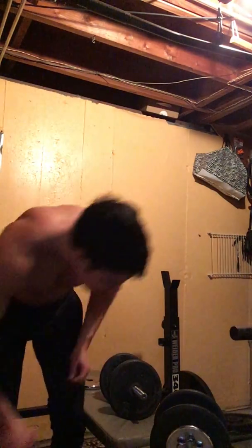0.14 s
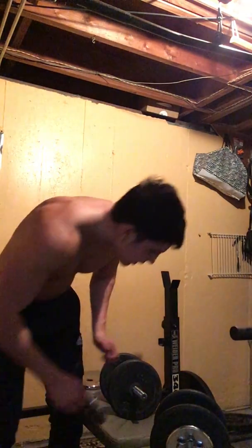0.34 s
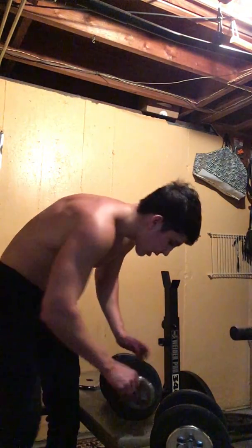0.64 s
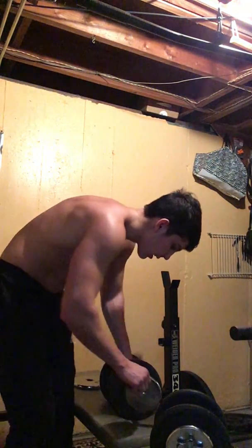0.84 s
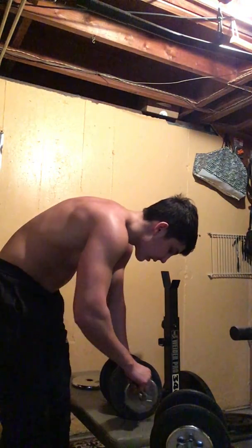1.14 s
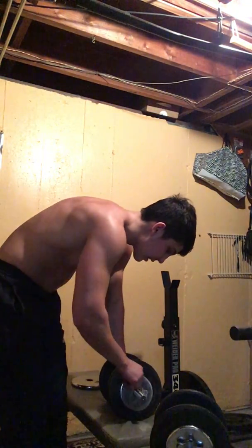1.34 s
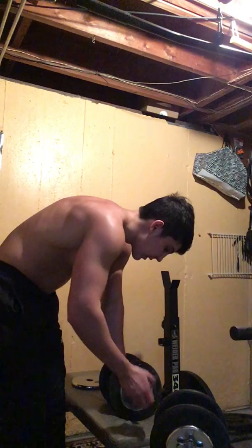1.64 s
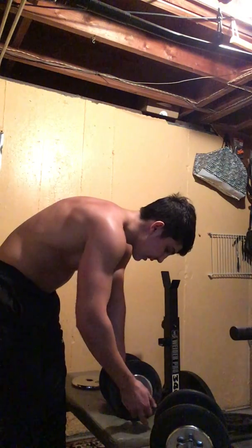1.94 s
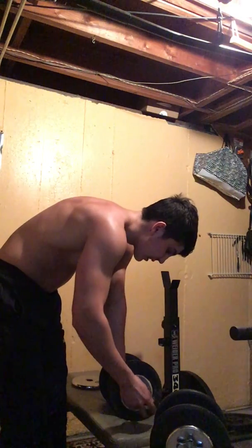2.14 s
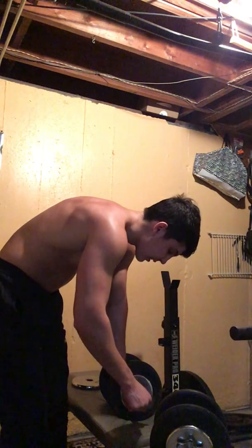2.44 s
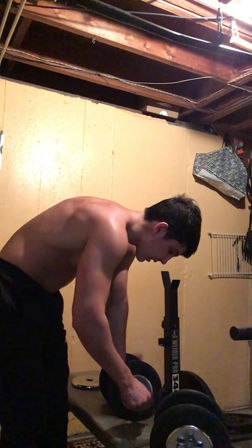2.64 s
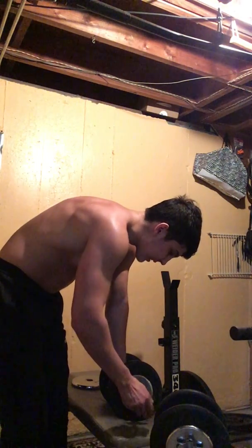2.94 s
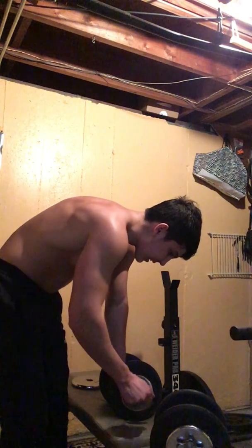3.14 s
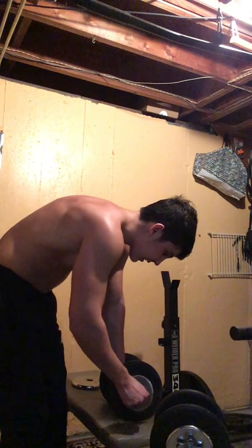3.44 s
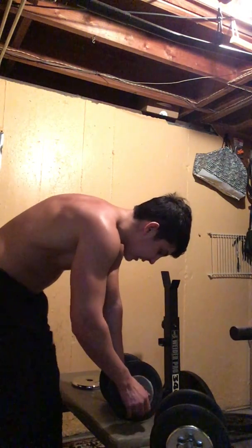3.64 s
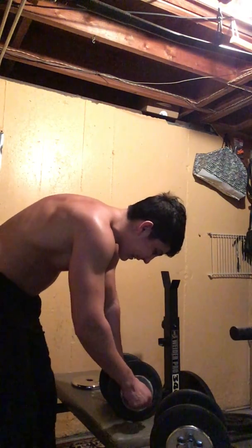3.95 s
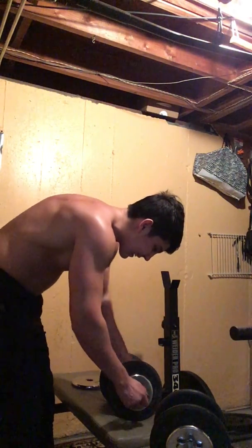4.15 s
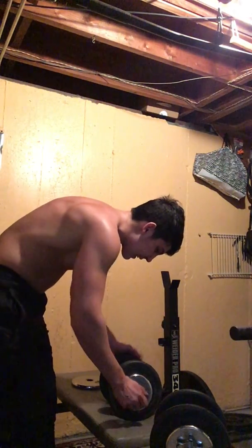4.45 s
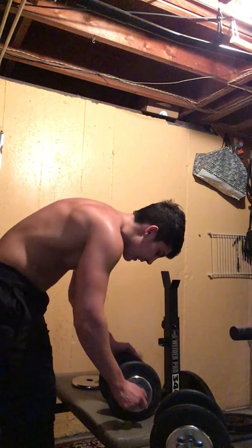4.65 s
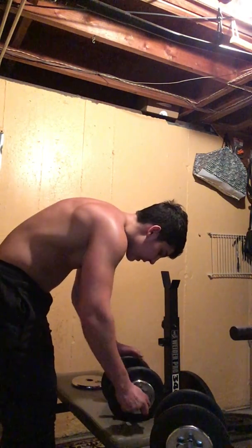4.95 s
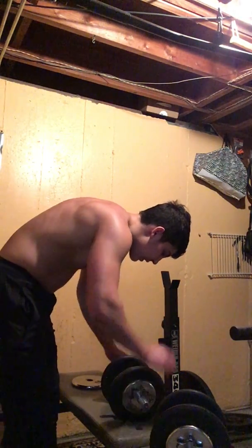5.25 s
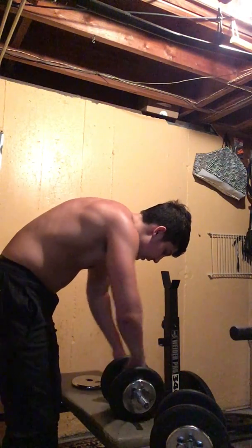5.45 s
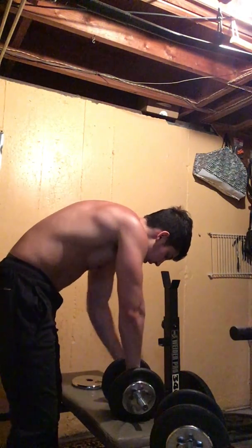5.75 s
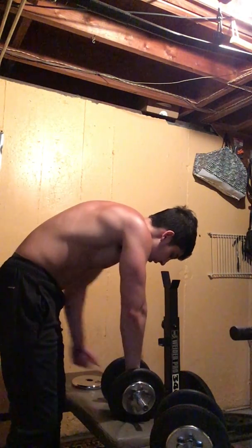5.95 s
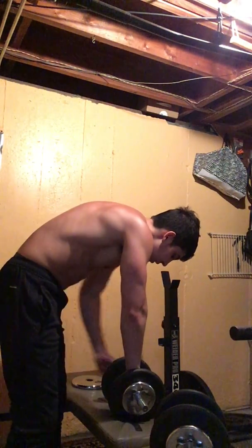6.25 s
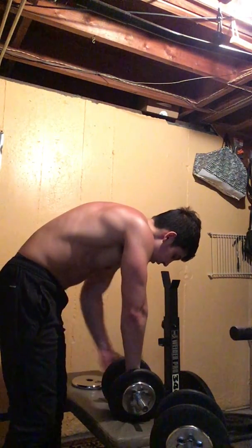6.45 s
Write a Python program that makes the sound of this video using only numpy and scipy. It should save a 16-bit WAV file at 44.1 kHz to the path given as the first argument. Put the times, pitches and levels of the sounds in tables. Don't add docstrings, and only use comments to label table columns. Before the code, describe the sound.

Steel weight plate taps a dumbbell handle, slides and clanks home ringing, then a threaded collar rasps tight in short twists over low basement fan rumble.

```python
import sys
import numpy as np
from scipy import signal
from scipy.fft import rfft, irfft, next_fast_len
from scipy.io import wavfile
from scipy.ndimage import uniform_filter1d, map_coordinates

SR = 44100
rng = np.random.default_rng(int(sys.argv[2]) if len(sys.argv) > 2 else 0)


def convert_level_to_amplitude(level_db):
    exponent = np.asarray(level_db, float) / 20
    return 10 ** exponent


def pcm_store(signal):
    levels = np.round(np.clip(np.atleast_2d(signal), -1, 1) * 32767)
    wavfile.write(sys.argv[1], SR, levels.astype(np.int16).T)


N = 291015

# [t/s, knock peak level/dB, ring level of the lowest mode family/dB, sharpness/dB per octave,
# extra level of the second family when struck near the hub/dB (may be absent)]
TAP_HITS = [
    (0.864, -17, -40, 2.4, 15.5),
    (0.911, -21.5, -60.5, 4.4, -12),
]
BEAT_HITS = [
    (0.864, -60, -32, 0),
]
SLIDE_HITS = [
    (1.139, -35, -50, -5.5, -0.5),
    (1.174, -41, -45.5, -1, -23.5),
    (1.199, -27.5, -29, 0.5, -22),
    (1.216, -30.5, -48, 4, 4),
    (1.298, -10, -28, -3.5, -9),
    (1.306, -25.5, -46.5, 2, 12),
    (1.344, -33, -49.5, -6, -7),
    (1.38, -33.5, -47.5, 5.5, -2.5),
]
HOME_HITS = [(1.394, -6, -29, 3, -2.5), (1.432, -13, -36.5, 15, -22), (1.44, -21, -22.5, 1, -11.5),
             (1.447, -15, -24, 5, -8), (1.462, -18.5, -36.5, 3.5, -6.5), (1.487, -46.5, -40.5, 12, -27.5),
             (1.511, -24, -31, -2.5, 8.5), (1.518, -12.5, -21, 6.5, -18), (1.528, -1.5, -21, 9, -4),
             (1.551, -22.5, -55, 8.5, 11.5), (1.584, -15.5, -29.5, 8, -5), (1.621, -12.5, -27.5, 4.5, -20),
             (1.663, -20, -35.5, 5, -14.5)]
SLAP_HITS = [
    (4.872, -30, -41, -7, -27),
    (4.926, -27, -30, -4.5, -12.5),
    (4.945, -22.5, -42.5, 8, -27),
    (4.962, -19.5, -40, 6.5, -13.5),
    (4.999, -18.5, -46.5, 5.5, -7),
]
SEAT_HITS = [
    (5.012, -6, -23, 3.8, 5.4),
]
COLLAR_HITS = [(1.914, -18, -55.5, 2.5, 22), (2.126, -73.0, -41, -14, -29), (2.168, -24, -46, -3, 9.5),
               (2.194, -26.5, -33, -11.5, -18), (2.378, -58, -62, -5.5, -4), (2.517, -26, -47.5, -4, 4),
               (2.752, -44, -48, -23, 2), (2.763, -29.5, -36, -8, -2), (2.773, -45, -44.5, -7.5, 11),
               (2.811, -25.5, -29, -11.5, -9), (2.832, -29, -39.5, -9, 7.5), (2.909, -34, -57, -9, 3),
               (2.989, -47, -47, -7, 2), (3.012, -28.5, -48.5, -10, 7),
               (3.115, -21.5, -51, 0.5, 14.5), (3.12, -50, -38, -7, 7), (3.159, -41, -45, -2, -8),
                (3.172, -25.5, -33.5, -7, -1), (3.204, -27, -26.5, -7, -7), (3.23, -25, -36, -8, -1),
                (3.257, -23.5, -32.5, -5, -5.5), (3.29, -28.5, -52.5, -3, 9), (3.33, -33, -43, -1, -1),
                (3.468, -23, -47.5, -2, 9), (3.538, -18.5, -33.5, -2.5, -5.5),
                (3.721, -54.5, -50.5, -6.5, -18.5), (3.734, -51.5, -46, -6, -25),
                (3.868, -20.5, -33.5, -7, 5), (3.925, -28.5, -33.5, -4, -23), (3.97, -24.5, -32, -2.5, -9),
                (4.094, -47, -40.5, -10, -12), (4.137, -31.5, -35, -9, -28), (4.253, -57, -38.5, -8.5, -13),
                (4.285, -32, -35.5, -5.5, -44), (4.376, -53.5, -59, -2.5, -13), (4.591, -22, -56, 2, 18.5),
                (4.656, -26.5, -53, -4, -1)]
JINGLE_HITS = [
    (4.945, -44, -71, 6.3, 0.0072),
    (4.962, -41.5, -74, 11, 0.0042),
]
TURN_HITS = [(4.802, -29.5, -33.5, -39, -6), (4.833, -49.5, -45, -34.5, -7), (5.393, -41.5, -79, -6, 8),
             (5.607, -36.5, -35, -18.5, 0), (5.632, -37, -37, -20, -4), (5.691, -31, -76, -19, 4.5),
             (5.946, -27, -51, -5, 6), (5.995, -19.5, -48, 3.5, 19), (6.014, -30, -43, -4, 22),
             (6.026, -22, -42, -13, 23), (6.106, -29.5, -48, -15, -1.0), (6.148, -35, -72, -12, -1),
             (6.381, -51, -75, 7, -9), (6.569, -30, -62.5, -10, 8), (6.577, -13.5, -42, 11.5, 25.5)]
BAR_HITS = [
    (4.795, -44.5, -70.5, 19, 0),
    (5.607, -56, -66, 21, 0),
    (5.948, -62, -66, 20, 0),
]
SPARE_HITS = [
    (5.013, -45, -40, -16),
    (5.395, -71, -79, 12),
    (5.992, -60, -48, -39),
    (6.055, -60, -47, -39),
]
PING_HITS = [
    (5.723, -37, -44, -35),
]

# [f/Hz, f/Hz, f/Hz, f/Hz]
FAMILY_HZ = dict(held=[1400, 3650, 5900, 8500], plate=[1920, 3080, 3650, 5900],
             collar=[1400, 3000, 10100, 15200], end=[3970, 6600, 9550, 10700],
             spare=[1738, 2422, 4000, 8000], bar=[8000, 9000, 10000, 11000])
TAP_HZ = [1459, 1701, 3079, 3198, 4382, 5862, 5870, 6568, 8489, 8507, 10930, 11830]
BEAT_HZ = [3647, 3653.4]
PLATE_HZ = [673, 1377, 1923, 1912, 2900, 3074, 3290, 3524, 3650, 3690, 3818, 4395, 5858, 5914, 6490, 6715,
            7430, 8512, 8630, 10860, 11750, 12230, 14140, 15300]
SMACK_HZ = [3160]
SEATED_HZ = [1927, 2460, 3090, 3284, 3524, 3577, 3655, 3698, 3818, 4430, 5938, 6490, 6729, 7440, 8533, 8629,
             10880, 11750, 12230, 14150, 15300]
COLLAR_HZ = [856, 1390, 1925, 2890, 3045, 3670, 4400, 6570, 9520, 10120, 11200, 12700, 15180]
STACK_HZ = [744, 1180, 1330, 1480]
END_HZ = [3973, 5240, 6600, 7500, 8300, 9550, 10700, 12700, 10640]
BAR_HZ = [11070]
SPARE_HZ = [1735, 1742, 1763, 2417, 2425.5]
PING_HZ = [1740, 1800, 2412]
DRAG_HZ = [2213, 2837, 3182, 3919, 7520]
TAPPED = [(-8, 0.017), (-3, 0.079), (-14, 0.16), (-10, 0.078), (-10, 0.049), (-29, 0.44), (-24, .2),
          (-4, .03), (3, 0.11), (-6, 0.28), (-22, .1), (-15, 0.44)]
BEAT = [(0, .35), (0, .35)]
HELD = [(-18, 0.07), (8, 0.018), (-19, 0.27), (-11, .2), (1, 0.24), (-4.5, 0.2), (-17, 0.12), (-5.5, .1),
        (-2.5, 0.15), (-18, 0.4), (-14, 0.086), (-5.5, 0.12), (1.5, 0.12), (-21.5, 0.23), (-9.5, 0.065),
        (-18, 0.13), (-11.5, 0.083), (-9.5, 0.11), (-9.5, 0.11), (-17, 0.089), (-11.5, 0.3), (-15, 0.13),
        (-29.5, .1), (-36, .1)]
LOOSE = [(-2.5, 0.049), (-21, 0.11), (5.5, 0.29), (-10.5, 0.1), (-17.5, .2), (2, 0.36), (-16, 0.13),
         (-14.5, 0.11), (1.5, 0.29), (-8.5, 0.05), (-29, 0.13), (-13.5, 0.45), (-2, 0.202), (1, 0.3),
         (-22.5, 0.17), (-9.5, 0.22), (-10.5, 0.13), (-6.5, 0.41), (-17.5, .2), (-20, 0.13), (-19, 0.24),
         (-31, 0.13), (-18, .15), (-33.5, 0.11)]
SMACK = [(0.0023, 0.0088)]
CLAMPED = [(-31, 0.087), (-28, .1), (2.5, 0.99), (-18.5, 0.33), (-15, 0.089), (5, 0.19), (-7, .14),
           (-10, .15), (12, 0.25), (-25.5, 0.15), (-10.5, 0.0914), (-14, .12), (-7.5, 0.061), (14.5, 0.036),
           (-26, 0.23), (-10.5, 0.17), (-20, 0.071), (-6.5, 0.084), (-9.5, 0.14), (-11.5, 0.047),
           (-16, 0.05), (-22, 0.11), (-26.5, .14), (-27, .1)]
SEATED = [(-1.5, 0.16), (-25, 0.27), (-0.5, 0.16), (-16, 0.19), (-4.5, 0.083), (-5, .09), (8.5, 0.08),
          (-13, 0.2), (3.5, 0.063), (-8, 0.14), (-11, 0.12), (3, 0.042), (-14.5, 0.2), (-12, 0.13),
          (-10.5, .13), (-10, 0.21), (-18, 0.13), (-19.5, .06), (-24, .08), (-11.5, .07), (-29, .1)]
COLLAR = [(-10, 0.069), (-0.5, 0.038), (-10, 0.24), (5.5, 0.035), (2.5, 0.051), (-7, 0.085), (2, 0.036),
          (-2.5, 0.038), (-7.5, 0.1), (2, 0.067), (-22.5, 0.065), (-24, 0.093), (-3.5, 0.1)]
STACK = [(-8, 0.039), (-4.5, 0.032), (-8, 0.078), (-14.5, 0.054)]
FAR_END = [(0.5, 0.054), (-17.5, 0.15), (-5, 0.0083), (-18.5, 0.11), (-12.5, 0.07), (-4, 0.092),
           (-12.5, 1.1), (-25, .08), (-22, .4)]
BAR = [(0.0055, .4)]
SPARE = [(0, 0.95), (-5, .95), (-9, .6), (-4, 1.1), (-4, 1.1)]
PING = [(0.5, 0.42), (0, 0.2), (-0.5, 0.48)]
DRAG = [(2, .6), (9, .6), (9, .6), (11, .6), (6, .6)]

# [t/s, peak level/dB, f/Hz, t60/s]
BLOWS = [(0.8641, -21, 1470, .014), (0.871, -31, 3650, 0.026), (0.91, -26.5, 1300, .01),
         (1.1995, -13.5, 1600, .009), (1.2984, -16, 1520, .009), (1.394, -11, 1520, .008),
         (1.408, -23.5, 1925, 0.14), (1.447, -21, 3650, 0.037), (1.462, -25, 3650, 0.021),
         (1.485, -25.5, 3650, 0.13), (1.5185, -11.5, 2220, .012), (1.5185, -22.5, 713, .02),
         (1.5275, -4, 3640, .03), (1.5268, -20.5, 5990, .02), (1.584, -27.5, 700, .015),
         (2.81, -30, 1370, .025), (2.826, -32, 2960, .015), (3.114, -29, 3030, .03),
         (3.2567, -33, 5480, .006), (3.2916, -39, 5000, .006), (3.4682, -33, 3000, .015),
         (4.122, -44, 3010, .01), (4.142, -41, 2700, .015), (4.946, -23.5, 6280, .012),
         (4.962, -21.5, 6740, .007), (5.447, -49.5, 1300, 0.054), (5.614, -40, 4000, .1),
         (5.632, -48, 7000, .008), (5.799, -60, 4070, .04), (5.994, -36, 7540, .005),
         (5.998, -29.5, 7060, .009), (6.014, -34, 6860, .009), (6.025, -29, 7000, .009),
         (6.578, -16, 6480, .009), (6.584, -18, 6400, .01)]
# [t/s, grind level/dB, rasp level/dB, fade/dB per s, wind-up level under the stroke/dB]
STROKES = [(0.864, -36.5, -52, 143, -28), (1.203, -31, -41, 71.5, -4), (1.299, -33.5, -47, 33.5, -8),
           (1.395, -34, -58.5, 39, -17), (1.445, -42.5, -53.5, 150, 6), (1.513, -38.5, -51, 25, -32),
           (1.545, -45, -50, 127.5, -15), (1.913, -41.5, -56, 89, -17), (2.169, -44.5, -53.5, 57.5, -7),
           (2.518, -42.5, -59, 126, -3), (2.756, -41.5, -59.5, 7.5, -38), (3.114, -35, -77, 25.5, -42),
           (3.469, -41, -65, 41, -37), (3.87, -41, -61.5, 11, -13.5), (4.26, -44.5, -60, 32.5, -29),
           (4.592, -55.5, -54, 39, -20), (4.794, -54, -69, -15, -8), (5.006, -39.5, -34.5, 69.5, -1),
           (5.395, -56.5, -81, 48, -10), (5.606, -48.5, -64, 43, -36), (5.953, -40, -57, 34, -37),
           (6.297, -51.5, -97.5, 4.5, -7), (6.582, -39.5, -53.5, 10, -10)]
# [start t/s, end t/s]
PLATE_FREE_S = [
    (0, 1.85),
    (4.86, 5.3),
]
SPARE_STOPS_S = [
    5.393,
    6.122,
]
# [t/s, length/s, level/dB]
RUSTLE = [
    (0.12, 0.14, -83),
    (0.3, 0.25, -86),
    (0.576, 0.24, -80),
    (1.604, 0.42, -73),
]

KNOCK = [(120, -38), (200, -6), (1410, -1), (2190, -3.5), (2830, 1), (5010, -8.5), (5920, -6), (6250, -6.5),
         (13300, -30.5), (15400, -36), (16300, -67)]
PLATE_KNOCK = [(120, -43.5), (250, -10), (1410, -1), (2830, 2), (4300, 2.5), (5050, -23.5), (5900, -7),
               (13300, -29), (15400, -37.5), (16300, -64)]
GRIND = [(120, -47), (200, -32.5), (325, -5.5), (542, -4.5), (700, -2.5), (1050, -6), (1430, -2),
         (2110, -14), (2960, -16.5), (5000, -32.5), (6500, -54), (11000, -120)]
RASP = [(1470, -15), (2500, -3), (4230, -2), (5020, -18), (6880, -13.5), (8110, -32), (9860, -21.5),
        (16300, -57.5)]
CLOTH = [(1500, 13), (3500, 11.5), (8500, 9), (15000, 6), (16500, -20)]
DRONE = [(15, -66.5), (25, -49.5), (32, -19), (42, -15.5), (54, -8.5), (67, 1.5), (95, -3), (118, -9.5),
         (131, -7.5), (152, 3), (170, -2.5), (211, -18), (251, -20.5), (331, -31), (500, -40), (650, -78.5),
         (1100, -120)]
AIR = [(150, -31), (250, -8), (445, -20), (820, -20.5), (1070, -26), (1490, -24.5), (3620, -39.5),
       (3950, -42), (9150, -38.5), (16300, -47.5)]
# [f/Hz, t60/s]
BASEMENT = [(300, 0.28), (2000, 0.25), (6000, 0.16), (14000, 0.14)]
# [f/Hz, level/dB]
PHONE = [(30, -16), (50, -6.5), (65, -1), (15000, -3), (16200, -8), (16700, -38.5)]


def unit(x):
    return x / np.sqrt(np.mean(x ** 2) + 1e-20)


def along(points, hz):
    f, v = np.transpose(points)
    return np.interp(np.log(hz + 1), np.log(f + 1), v)


def wobble(rate):
    knots = rng.standard_normal(int(N * rate / SR) + 4)
    return map_coordinates(knots, [np.arange(N) * rate / SR])


def filtered(x, response):
    m = next_fast_len(len(x) + 8192)
    return irfft(rfft(x, m) * response(np.fft.rfftfreq(m, 1 / SR)), m)[:len(x)]


def coloured(x, spectrum):
    return unit(filtered(x, lambda hz: convert_level_to_amplitude(along(spectrum, hz))))


def tail(seconds):
    hz, t, z = signal.stft(rng.standard_normal(int(seconds * SR)), SR, nperseg=256)
    h = signal.istft(z * convert_level_to_amplitude(-60 * t / along(BASEMENT, hz)[:, None]), SR, nperseg=256)[1]
    return h / np.linalg.norm(h)


def ringing(t, hz, t60, strength_db, detune, flutter_db):
    turns = hz * (1 + rng.normal(0, detune, hz.shape)) * 2 * np.pi
    fall = np.float32(np.log(1000) / t60)
    knots = np.maximum(1 - np.abs(t * 50 - np.arange(24, dtype=np.float32)[:, None]), 0)
    depth = rng.normal(0, flutter_db / 20 * np.log(10), (len(hz), len(knots)))
    flutter = np.float32(depth) @ knots
    envelope = np.exp(flutter * np.minimum(t * 40, 1) - fall * t)
    return convert_level_to_amplitude(strength_db[:, 0]) @ (envelope * np.sin(np.float32(turns) * t))


def iron_knock(t, knock_s, rise_s, knock, tilt):
    colour = [(f, db + tilt * np.log2(f / 2500)) for f, db in knock]
    body = convert_level_to_amplitude(-60 * t / knock_s) * (1 - np.exp(-t / rise_s))
    crack = 0.94 * convert_level_to_amplitude(-60 * t / 0.00084)
    envelope = (body + crack) * (1 - np.exp(-t / 0.00028))
    return envelope * coloured(rng.standard_normal(len(t)), colour)


def contacts(hits, modes_hz, modes, family, top_db, ring_db, knock_db, knock_s, usual_db, quench_db, detune,
             flutter_db, room_db, rise_s, knock=KNOCK, size=19800, stops_s=(), stop_db=-13, scatter_db=1.5):
    out, t = np.zeros(N + 2 * SR), np.arange(size, dtype=np.float32) / SR
    hz, level, t60 = np.column_stack([modes_hz, modes]).T[:, :, None]
    touches = np.sort(np.transpose(hits)[0])
    anchors = FAMILY_HZ[family]
    octaves = np.log2(np.divide(anchors, anchors[0]))
    for s, peak_db, low_db, sharp, *hub_db in hits:
        family_db = low_db + sharp * octaves + [0, sum(hub_db), 0, top_db]
        strength = level + ring_db + along(list(zip(anchors, family_db)), hz)
        strength = strength + rng.normal(0, scatter_db, hz.shape)
        ring = ringing(t, hz, t60, strength, detune, flutter_db)
        touched = np.searchsorted(touches[touches > s] - s, t)
        stopped = np.searchsorted(stops_s, s + t) - np.searchsorted(stops_s, s)
        lost_db = min(quench_db, 0) * touched + stop_db * stopped
        ring *= convert_level_to_amplitude(uniform_filter1d(lost_db, size=88)) * (1 - np.exp(-t / 0.00074))
        tilt = np.clip(0.15 * (family_db[-1] - peak_db - usual_db), -5, 3)
        ring[:SR // 4] += convert_level_to_amplitude(peak_db + knock_db) * iron_knock(t[:SR // 4], knock_s, rise_s, knock, tilt)
        wet = signal.fftconvolve(ring, tail(size / SR))
        out[round(s * SR):][:len(t)] += ring
        out[round(s * SR) + 250:][:len(wet)] += convert_level_to_amplitude(room_db) * wet
    return out[:N]


def plate_tap():
    tap = contacts(TAP_HITS, TAP_HZ, TAPPED, "held", top_db=-13, ring_db=1.5, knock_db=-6.5, knock_s=0.046,
                   usual_db=-9, quench_db=0, detune=0, flutter_db=1, room_db=-7, rise_s=0.0038,
                   knock=PLATE_KNOCK, size=15000, scatter_db=0)
    beat = contacts(BEAT_HITS, BEAT_HZ, BEAT, "held", top_db=0, ring_db=0, knock_db=-20, knock_s=0.03,
                    usual_db=0, quench_db=0, detune=0, flutter_db=0, room_db=-24, rise_s=0.002,
                    size=15000, scatter_db=0)
    return tap + beat


def plate_slide():
    return contacts(SLIDE_HITS, PLATE_HZ, HELD, "held", top_db=-12.5, ring_db=0, knock_db=-8, knock_s=0.041,
                    usual_db=-7, quench_db=1.5, detune=0.0013, flutter_db=7, room_db=-5, rise_s=0.005,
                    knock=PLATE_KNOCK, size=13000)


def plate_home():
    return contacts(HOME_HITS, PLATE_HZ + SMACK_HZ, LOOSE + SMACK, "plate", top_db=-18, ring_db=-4.5,
                    knock_db=-11.5, knock_s=0.025, usual_db=-14.5, quench_db=-11, detune=0.000972,
                    flutter_db=3.5, room_db=-5.5, rise_s=0.0011, knock=PLATE_KNOCK)


def plate_slap():
    slap = contacts(SLAP_HITS, PLATE_HZ, CLAMPED, "plate", top_db=-2, ring_db=-3.5, knock_db=-4,
                    knock_s=0.042, usual_db=-21.5, quench_db=-2.5, detune=0.0017, flutter_db=7.5,
                    room_db=-4.5, rise_s=0.0039, knock=PLATE_KNOCK, size=13000,
                    stops_s=np.transpose(SEAT_HITS)[0], stop_db=-25)
    seat = contacts(SEAT_HITS, SEATED_HZ, SEATED, "plate", top_db=0.7, ring_db=0.5, knock_db=-12,
                    knock_s=0.043, usual_db=-20, quench_db=0, detune=0.0013, flutter_db=3.5,
                    room_db=-9, rise_s=0.0024)
    return slap + seat


def collar():
    return contacts(COLLAR_HITS + JINGLE_HITS, COLLAR_HZ + STACK_HZ, COLLAR + STACK, "collar",
                    top_db=-14, ring_db=-0.5, knock_db=-10.5, knock_s=0.041, usual_db=-41.5, quench_db=-19,
                    detune=0.002, flutter_db=3.5, room_db=0, rise_s=0.00085, size=11500)


def dumbbell_turned():
    end = contacts(TURN_HITS, END_HZ, FAR_END, "end", top_db=4.5, ring_db=-3.5, knock_db=-12.5,
                   knock_s=0.049, usual_db=-25.5, quench_db=-4.5, detune=0.00077, flutter_db=4.5,
                   room_db=0, rise_s=0.00057, size=15000)
    bar = contacts(BAR_HITS, BAR_HZ, BAR, "bar", top_db=-7, ring_db=-6.5, knock_db=-13.5, knock_s=0.033,
                   usual_db=-14, quench_db=-19.5, detune=0.00047, flutter_db=2, room_db=-10.5,
                   rise_s=0.0015, size=13000)
    return end + bar


def blows():
    out, t = np.zeros(N + SR), np.arange(SR // 8) / SR
    for s, db, hz, t60 in BLOWS:
        push = convert_level_to_amplitude(db - 60 * t / t60) * np.sin(2 * np.pi * hz * t)
        out[round(s * SR):][:len(t)] += push * (1 - np.exp(-t / 0.00027))
    return out[:N] + convert_level_to_amplitude(-7.5) * signal.fftconvolve(np.pad(out, (250, 0)), tail(0.36))[:N]


def strokes():
    gather, rasp_under = 152.5, -26.5
    rasp_fade, rasp_faster = 34.5, 3
    s, grind_db, rasp_db, fade, wind_db = np.transpose(STROKES)
    t = np.arange(N) / SR
    after = np.searchsorted(s, t)
    this, coming = np.maximum(after - 1, 0), np.minimum(after, len(s) - 1)
    since, until = t - s[this], np.abs(s[coming] - t)
    grind_fading = grind_db[this] - fade[this] * since
    rasp_fading = rasp_db[this] - (rasp_fade + rasp_faster * fade[this]) * since
    wind = (grind_db + wind_db)[coming] - gather * until
    rasp_wind = wind + rasp_under - gather * until
    return convert_level_to_amplitude([grind_fading, rasp_fading]) * (after > 0) + convert_level_to_amplitude([wind, rasp_wind])


def rubbing(when, modes_hz, modes, sing_db, rasp_db):
    grind, rasp = strokes() * when
    slips = rng.standard_normal((3, N)) * convert_level_to_amplitude(2.5 * wobble(60) + 2.7 * wobble(300))

    def body(f):
        response = 0
        for centre, (db, t60) in zip(modes_hz, modes):
            resonance = centre * centre - f * f + 1j * f * (9.7 / t60)
            response = response + convert_level_to_amplitude(db) * 1j * f * (2.6 / t60) / resonance
        return response

    z = signal.stft(slips[0], nperseg=512)[2]
    seating = uniform_filter1d(rng.standard_normal(z.shape), size=3, axis=0)
    seating = uniform_filter1d(seating, size=14, axis=1)
    shifting = signal.istft(z * convert_level_to_amplitude(2.6 * unit(seating)), nperseg=512)[1][:N]
    rough = grind * coloured(shifting, GRIND)
    push = convert_level_to_amplitude(-4) * rough + convert_level_to_amplitude(sing_db) * grind * slips[2]
    return rough + convert_level_to_amplitude(rasp_db) * rasp * coloured(slips[1], RASP) + filtered(push, body)


def steel_rub():
    t = np.arange(N) / SR
    free = sum((t >= start) & (t < end) for start, end in PLATE_FREE_S) > 0
    hands_move_s = 4.79
    early, late = (t < hands_move_s) & ~free, (t >= hands_move_s) & ~free
    rub = rubbing(free, PLATE_HZ, LOOSE, sing_db=-5.5, rasp_db=15)
    rub += rubbing(early, COLLAR_HZ + STACK_HZ, COLLAR + STACK, sing_db=-3.5, rasp_db=14.5)
    rub += rubbing(late, END_HZ + DRAG_HZ, FAR_END + DRAG, sing_db=0.5, rasp_db=19.5)
    return convert_level_to_amplitude(-6) * (rub + convert_level_to_amplitude(-8.5) * signal.fftconvolve(rub, tail(0.5))[:N])


def spare_plate():
    hum = contacts(SPARE_HITS, SPARE_HZ, SPARE, "spare", top_db=27, ring_db=1, knock_db=-12.5, knock_s=0.03,
                   usual_db=-18, quench_db=0, detune=0, flutter_db=1.6, room_db=-20, rise_s=0.0015,
                   stops_s=SPARE_STOPS_S, scatter_db=0)
    ping = contacts(PING_HITS, PING_HZ, PING, "spare", top_db=27, ring_db=1.5, knock_db=-12.5, knock_s=0.032,
                    usual_db=-18, quench_db=0, detune=0, flutter_db=4, room_db=-15, rise_s=0.0015, size=13000)
    return hum + ping


def cloth():
    t = np.arange(N) / SR
    brush = np.zeros(N)
    for s, length, db in RUSTLE:
        brush += convert_level_to_amplitude(db) * np.sqrt(np.abs(np.sin(np.pi * np.clip((t - s) / length, 0, 1))))
    return brush * convert_level_to_amplitude(10.5 + 1.7 * wobble(58)) * coloured(rng.standard_normal(N), CLOTH)


def furnace():
    drone = convert_level_to_amplitude(-50 + 1.6 * wobble(5.3)) * coloured(rng.standard_normal(N), DRONE)
    return drone + convert_level_to_amplitude(-64) * coloured(rng.standard_normal(N), AIR)


def scene():
    plate = plate_tap() + plate_slide() + plate_home() + plate_slap()
    handling = collar() + dumbbell_turned() + blows() + steel_rub()
    background = spare_plate() + cloth() + furnace()
    return (plate + handling + background)[None]


def low_pass(x):
    return signal.sosfilt(signal.butter(12, 16440, fs=SR, output="sos"), x)


def record(dry):
    heard = filtered(dry[0], lambda hz: convert_level_to_amplitude(along(PHONE, hz)))
    return low_pass(heard[None])


dry = scene()
out = record(dry)
pcm_store(out)
```